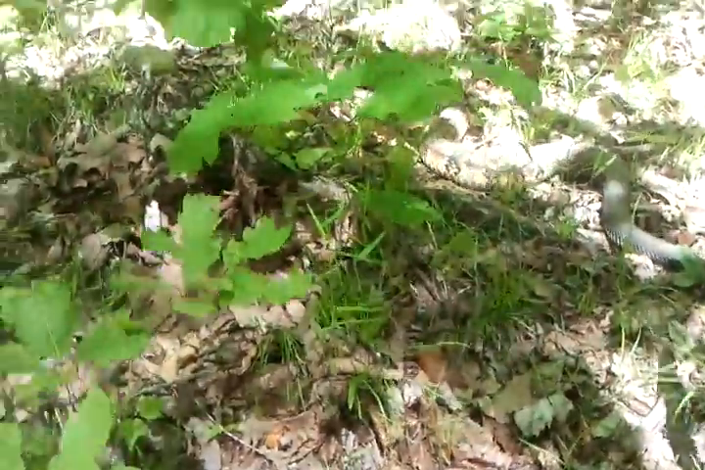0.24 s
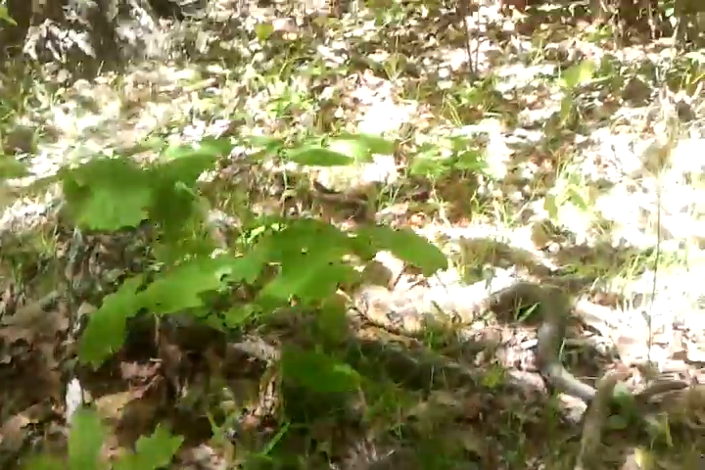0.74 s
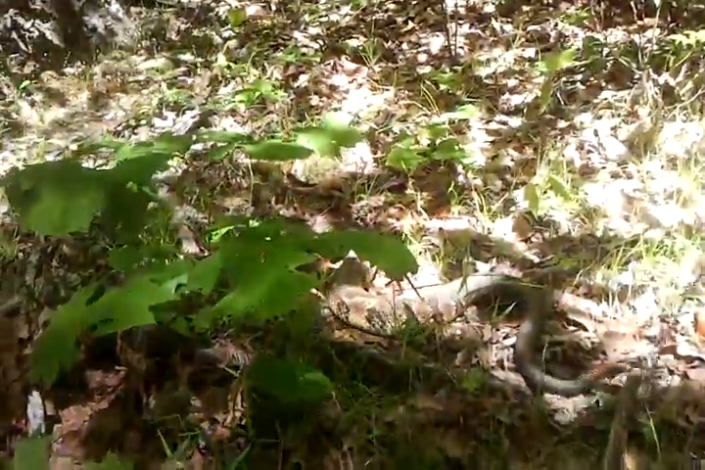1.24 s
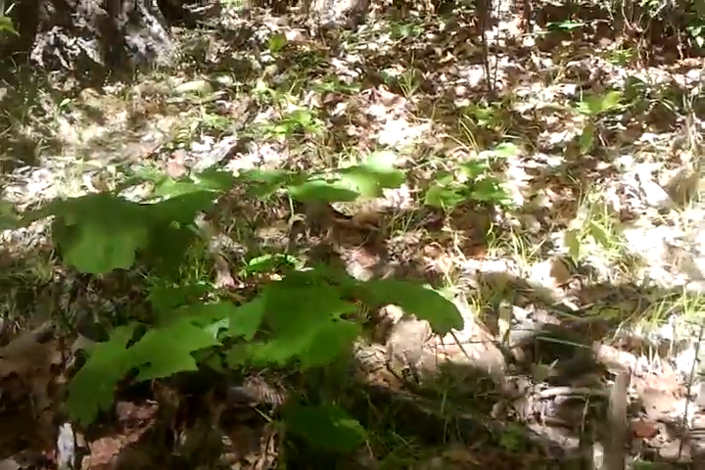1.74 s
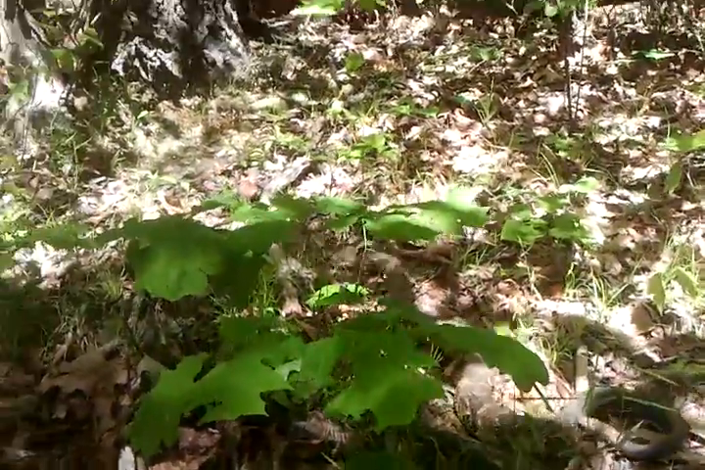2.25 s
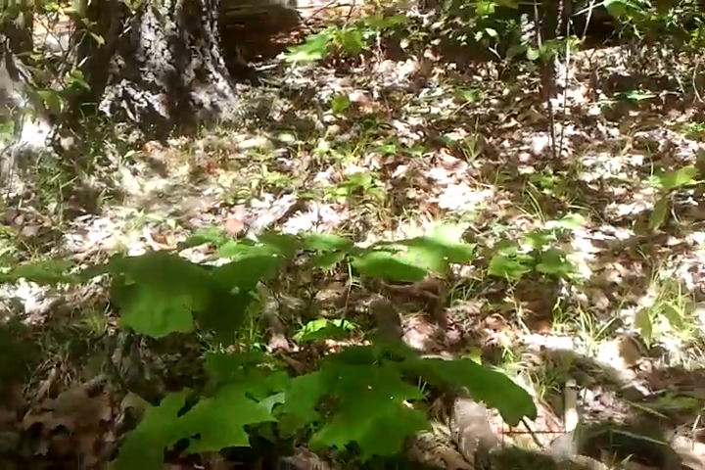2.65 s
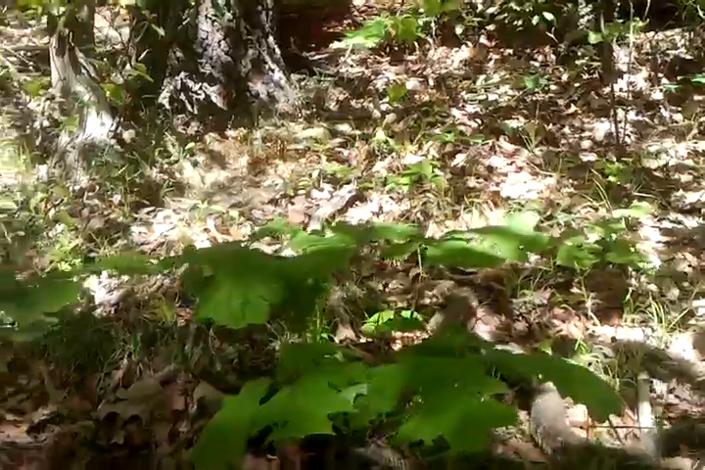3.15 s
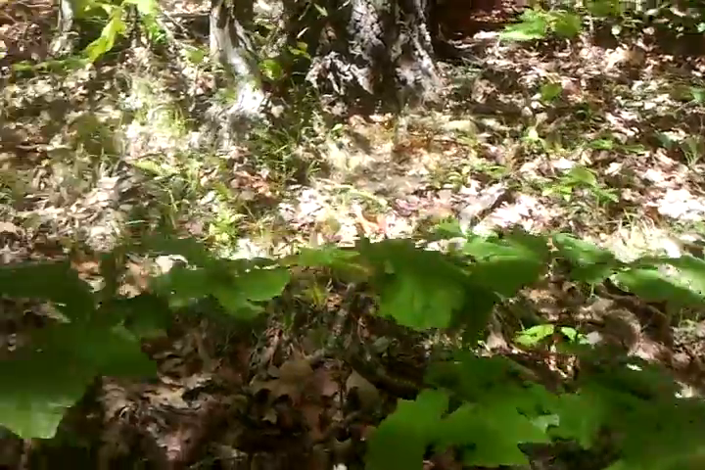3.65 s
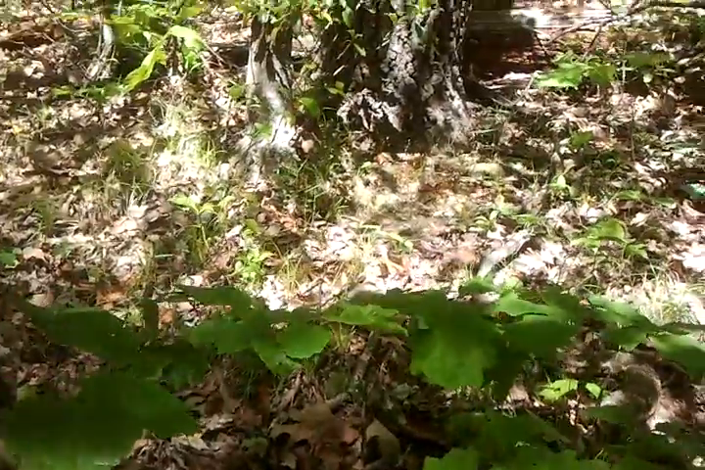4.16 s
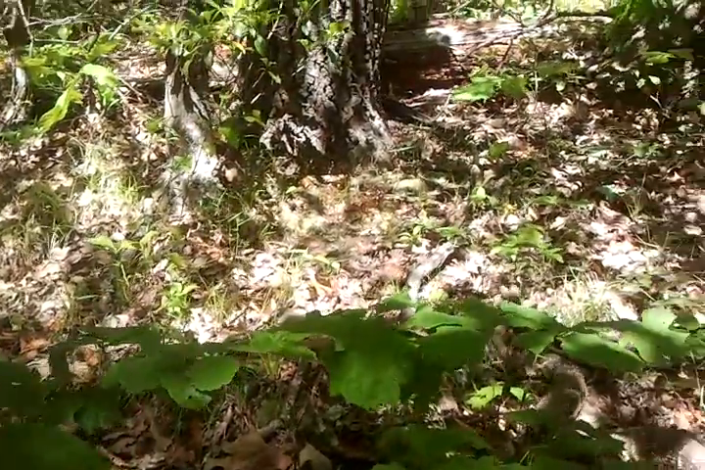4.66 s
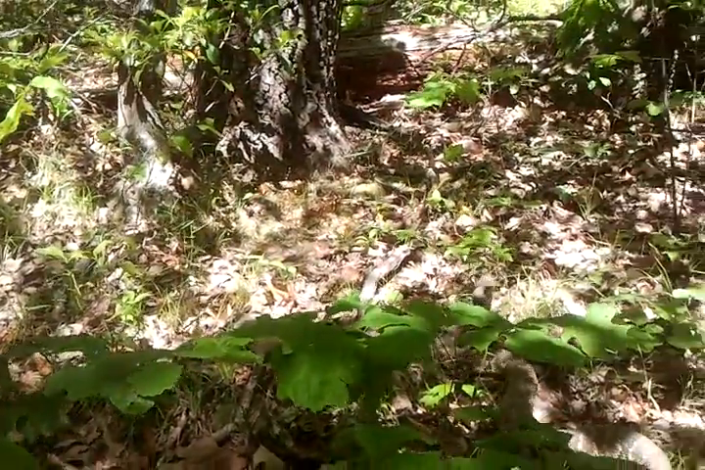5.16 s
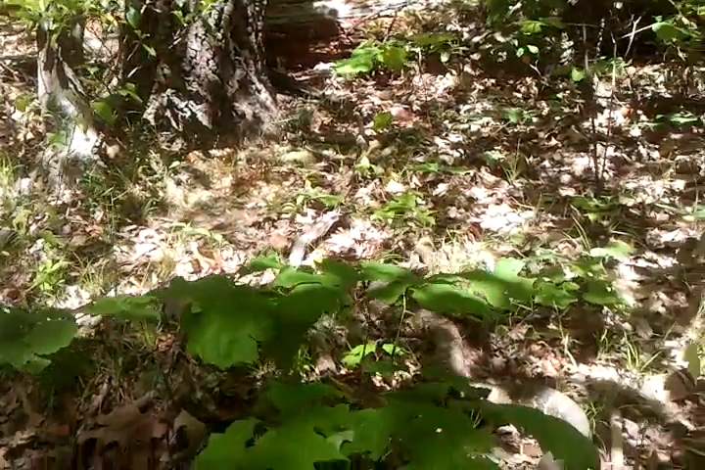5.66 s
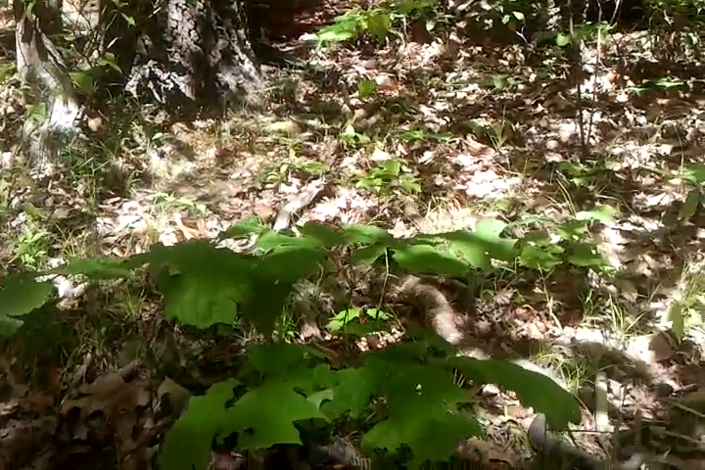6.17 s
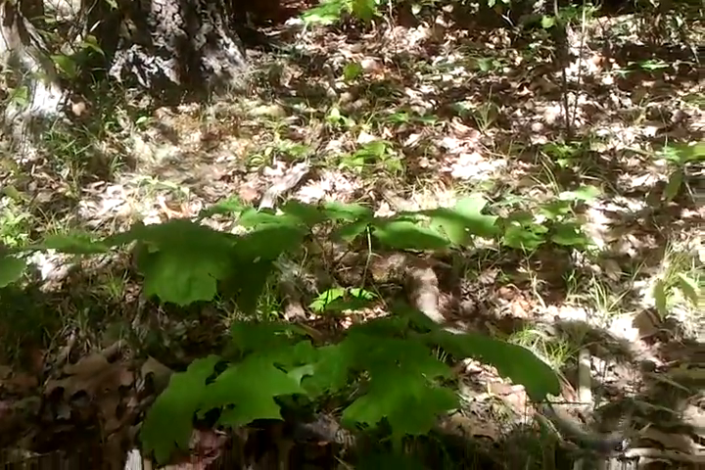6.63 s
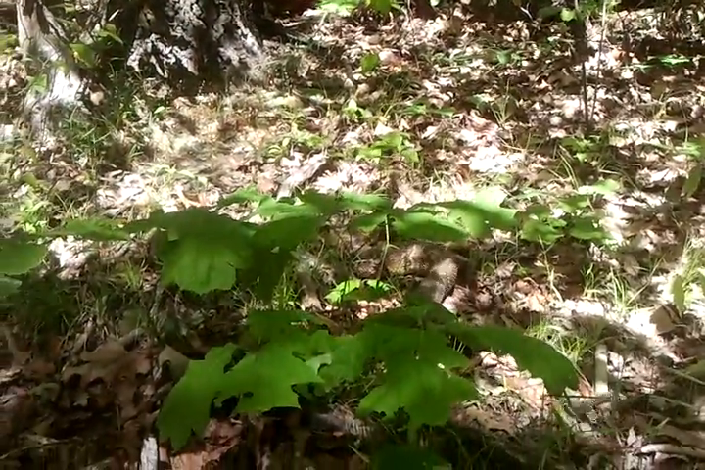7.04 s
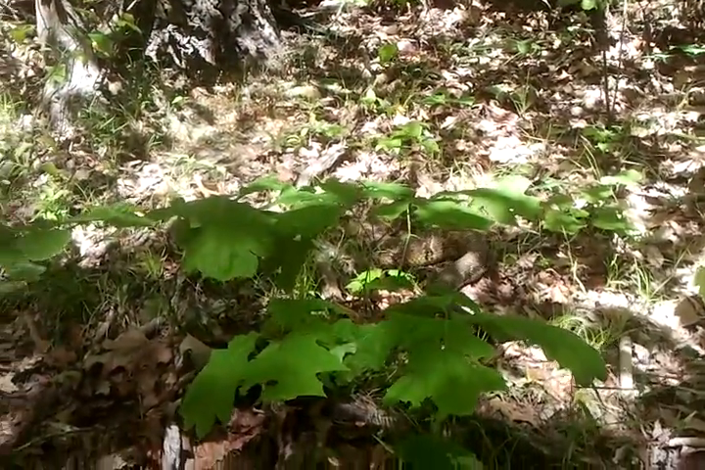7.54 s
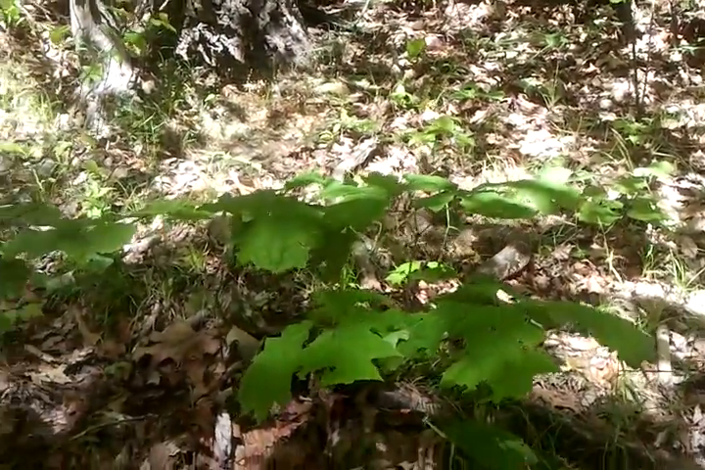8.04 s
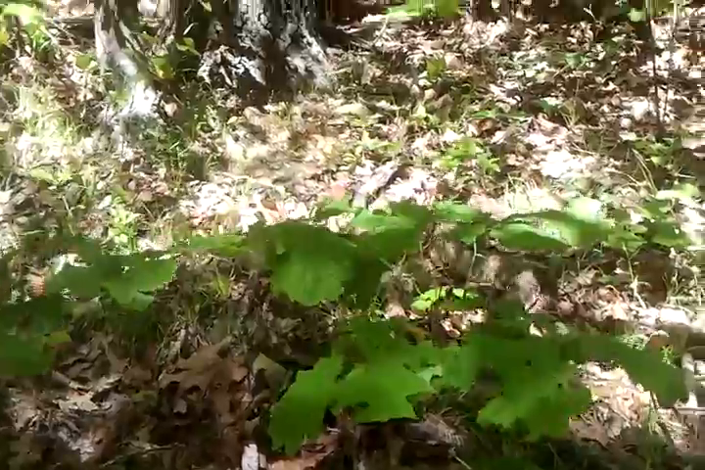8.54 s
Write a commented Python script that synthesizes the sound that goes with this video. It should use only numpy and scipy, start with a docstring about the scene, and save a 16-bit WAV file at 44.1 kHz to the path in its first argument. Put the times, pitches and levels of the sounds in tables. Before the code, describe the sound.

On a quiet forest floor, dry leaves stir and are crushed in uneven, crisp bursts, dotted with sharp little twig snaps. The crunching is strongest in the first half, where soft ground thuds sit under it, and then thins to lighter crackles and ticks. Throughout, a few steps away, a rattlesnake's tail keeps up a faint, high buzz against an even hush of air in the trees.

```python
"""From the start a rattlesnake's tail sizzles faintly, a few steps away, over the soft hush of a wood,
and dry leaf litter stirs. Almost at once the litter is crushed: it crackles and crunches in bursts while
leaves and twigs snap. From about 1.5 to 4 seconds the ground thuds under the heavier breaks. After that
the crushing turns lighter, and sizzle and hush carry on to the end.
Nothing sounds above about 9 kHz."""
import sys
import numpy as np
from scipy import signal
from scipy.fft import rfft, irfft
from scipy.io import wavfile
from scipy.ndimage import uniform_filter1d

SR = 44100
rng = np.random.default_rng(int(sys.argv[2]) if len(sys.argv) > 2 else 0)


def bounce(signal):
    """Save signal as a 16-bit WAV file at the path given by the first command-line argument."""
    frames = np.transpose(np.atleast_2d(signal))
    limited = np.clip(frames, -1, 1)
    pcm = np.round(limited * 32767).astype(np.int16)
    wavfile.write(sys.argv[1], SR, pcm)


N = 388080

# EQ of the air in the trees. Each row: frequency in Hz, relative gain in dB.
HUSH_EQ = [(20, -13), (50, -9.5), (100, -3), (200, -1.5), (350, 2.5), (700, 0), (1300, -2), (2500, -4.5),
           (5000, -14), (9000, -23)]
# EQ of the tail's horny segments. Each row: frequency in Hz, relative gain in dB.
TAIL_EQ = [(2000, -22.5), (3300, -6.5), (4500, -3), (5700, -3.5), (6700, 1.5), (7400, -1), (7900, -1),
           (8600, -11.5)]
# The faint shifting of the leaves. Each row: time in seconds, crackle send in dB.
STIR_FADER = [(0.0, -56), (1.0, -53), (1.999, -49), (3.5, -52.5), (4.6, -52), (5.25, -56), (6.4, -54.5),
              (7.6, -55), (8.1, -52.5), (8.8, -51.5)]
# The litter is pressed down. Each row: start in seconds, hold in seconds, crackle send in dB,
# low crunch in dB relative to that send.
LITTER_PRESSES = [(0.244, 0.041, -37.5, -11), (0.30, 0.029, -43, -11), (0.49, .16, -52.5, -9.5),
                  (1.10, .17, -51, -9), (1.385, .035, -44, -8.5), (1.45, 0.027, -44.5, -24),
                  (1.505, 0.026, -37, -13.5), (1.584, 0.029, -33, -12.5), (1.641, 0.18, -38, -10),
                  (1.891, 0.088, -41.5, -12), (2.025, .045, -43.5, -12), (2.11, .16, -47, -14),
                  (2.342, 0.078, -37.5, -11), (2.44, 0.14, -44.5, -11), (2.61, 0.044, -49.5, -6.5),
                  (2.87, 0.17, -53, -22), (3.17, .11, -48, -9.5), (3.323, 0.27, -47, -13),
                  (3.76, 0.16, -49, -21), (3.95, 0.054, -51.5, -14), (4.44, .18, -51, -16),
                  (4.805, 0.12, -47, -14), (5.0, 0.063, -46.5, -12), (5.375, 0.028, -44.5, -11),
                  (5.47, 0.11, -49, -9.5), (5.625, .06, -50, -10.5), (5.89, 0.2, -51.5, -16),
                  (6.23, 0.099, -52, -13), (6.38, 0.067, -49.5, -10), (6.489, 0.13, -50.5, -11.5),
                  (7.79, 0.061, -47.5, -10.5), (7.96, .14, -48.5, -9), (8.25, 0.11, -50.5, -8),
                  (8.51, 0.13, -53, -8), (8.72, .08, -53, -7)]
# EQ of the bright crackle of the leaves. Each row: frequency in Hz, relative gain in dB.
CRACKLE_EQ = [(1500, -28), (2500, -13), (3200, -6.5), (4000, -4.5), (5400, -1), (6600, 3), (7600, 3.5),
              (8500, -0.5)]
# EQ of the dull crunch deeper in the litter. Each row: frequency in Hz, relative gain in dB.
CRUNCH_EQ = [(25, -3), (100, -3), (250, -1), (500, 0), (1200, 0.5), (2200, 2), (3000, 0), (4500, -30)]
# Single leaves and twigs break; the two rows near 1.47 and 1.48 s, lower and longer, are brief scrapes. # Each
# row: start in seconds, send level in dB, ring pitch in Hz, # low body in dB relative to that level, decay time
# of the fractures in milliseconds.
BREAKS = [(0.2705, -34, 6900, -14, 1.4), (0.2796, -36, 6700, -5, 3.5), (0.3415, -37.5, 6750, -12, 2),
          (0.3773, -48, 4580, 2, 1.3), (0.4219, -38, 6240, -13, .6), (0.556, -22, 7300, -25.5, 1.4),
          (1.108, -42, 6100, -21, 1.5), (1.1616, -32.5, 6760, -15, 0.91), (1.188, -28.5, 6900, -17, 0.27),
          (1.2036, -37.5, 7000, -16, 0.95), (1.2303, -39.5, 6700, -10.5, 1.6), (1.338, -38, 6300, -10, 1.2),
          (1.363, -43, 5800, -5, 0.71), (1.3871, -38, 7100, -4.5, 3.1), (1.467, -37, 4400, -20, 5),
          (1.484, -39, 4170, -21, 2.5), (1.569, -34.5, 6200, -17, 3.6), (1.585, -31.5, 6060, -6, 1.5),
          (1.6967, -37, 5800, -6.5, 1.4), (1.7252, -39.5, 6300, 4, 2.1), (1.7972, -26, 7650, -20, 0.73),
          (1.8108, -21, 7500, -27, 0.17), (1.8515, -32, 7100, -15, 0.71), (1.9694, -36.5, 5860, -7.5, 1.5),
          (2.029, -32.5, 6500, -12.5, 0.35), (2.064, -36, 6100, -8, 1.9), (2.1275, -45, 6400, -2.5, 0.64),
          (2.1775, -41.5, 5700, -4, 0.37), (2.3983, -38, 5860, -3, 1), (2.814, -34.5, 7600, -25, 1.8),
          (2.931, -45, 6300, -16, 1.6), (3.006, -29, 7000, -12, 1.5), (3.01, -29.5, 7240, -19, 0.58),
          (3.04, -24.5, 6600, -15, 1.3), (3.3293, -25, 5900, -13, 0.67), (3.393, -35, 6300, -9.5, 1.2),
          (3.4014, -41, 5900, 3, 0.79), (3.5846, -37, 6900, -18, 0.37), (3.638, -32, 6170, -20, 0.71),
          (3.7654, -32.5, 6330, -12.5, 2.4), (3.892, -37.5, 5540, -12.5, 0.61),
          (3.9649, -42.5, 4660, -9.5, .5), (4.12, -37.5, 6500, -16, 0.26), (4.226, -44, 6050, -5.5, 0.42),
          (4.33, -44.5, 6000, -3.5, 1.8), (4.3592, -37, 5660, -17, 0.32), (4.4544, -42, 6000, -16, 3.6),
          (4.479, -41, 6600, -6.5, 2.2), (4.4981, -40.5, 6100, -10, 1.4), (4.5643, -44, 5440, -8, 0.8),
          (4.5843, -40.5, 5240, -16, .8), (4.609, -45, 5400, -9, .8), (4.7227, -37.5, 5260, -11, 0.82),
          (4.7347, -42, 5800, -6, 1.3), (4.8033, -30.5, 6400, -5, 3.6), (4.894, -37, 6370, -10.5, .7),
          (5.52, -42, 6270, -8.5, 0.5), (5.5459, -44.5, 6900, -2.5, .7), (5.7694, -38.5, 6700, -10.5, 2.2),
          (6.2924, -42, 6400, -13, 1.8), (6.392, -41, 6500, -21, .4), (6.4125, -42, 6600, -6, 1.8),
          (6.5575, -40.5, 6800, -10, 1.6), (7.0607, -38, 7060, -6, 2.1), (7.291, -45.5, 6800, -18, 1.4),
          (7.36, -47, 5650, -18, 1.5), (7.5024, -43, 6460, -10, 0.45), (7.6562, -42.5, 4570, -13, 1.9),
          (7.835, -39, 6200, -22, .4), (7.889, -55, 4400, 8.5, 2), (7.9489, -42, 7200, -22, .5),
          (7.9806, -41, 6100, -15, 0.32), (8.5277, -40, 6750, -10, 0.57), (8.6057, -55, 4000, 9.5, 2.2),
          (8.7716, -38.5, 6700, -8, 1.2)]
# The resonances of dry wood. Each row: frequency in Hz, bandwidth in Hz, gain in dB.
WOOD_RESONANCES = [(1270, 310, -11), (2130, 400, -14.5), (4190, 530, -6)]
# EQ of a snap's sharp edge. Each row: frequency in Hz, relative gain in dB.
EDGE_EQ = [(1500, -21.5), (2800, -11.5), (4000, -4), (5200, 1), (6500, -3.5), (7600, 4), (9000, -8)]
# EQ of a snap's low knock. Each row: frequency in Hz, relative gain in dB.
BODY_EQ = [(30, -10), (150, -10.5), (450, -6.5), (900, -2.5), (1500, -3), (2300, -1.5), (3200, -1),
           (5000, -20)]
# The ground gives way. Each row: start in seconds, peak in dB ahead of the low cut.
GROUND_PUSHES = [(1.586, -40), (1.728, -34), (2.064, -34.5), (3.011, -43), (3.04, -36), (3.328, -39),
                 (3.4019, -36.5), (3.892, -48)]

CUTOFF_HZ = 8290  # the high cut


def from_db(db):
    """Decibels to gain."""
    return 10 ** (np.asarray(db) / 20)


def rms_one(x):
    """Scale to an rms of 1."""
    return x / np.sqrt(np.mean(x ** 2) + 1e-20)


def drift(per_s):
    """A random modulator with an rms of 1, gliding to `per_s` new values a second."""
    knots = rng.standard_normal(8192)
    return rms_one(np.interp(np.arange(N) / SR * per_s, np.arange(len(knots)), knots))


def equalise(x, curve):
    """Apply an EQ curve, scaled so that white noise comes out with its full power below the high cut."""
    hz = np.arange(N // 2 + 1) * SR / N
    curve_hz, curve_db = np.transpose(curve)
    gain = from_db(np.interp(np.log(hz + 1), np.log(curve_hz), curve_db))
    return irfft(rfft(x) * gain / np.sqrt(np.mean(gain ** 2 * (hz < CUTOFF_HZ))), N)


def resonate(x, hz, width_hz):
    """One resonance with a peak gain of 1."""
    radius = np.exp(-np.pi * width_hz / SR)
    feedback = [1, -2 * radius * np.cos(2 * np.pi * hz / SR), radius ** 2]
    return signal.lfilter(np.array([1, 0, -1]) * (1 - radius ** 2) / 2, feedback, x + 1e-18)


def clicks(per_s, spread_db, largest_db):
    """Clicks at random moments, many small and few large."""
    sizes = from_db(largest_db * np.tanh(spread_db * rng.exponential(1, N) / largest_db))
    return sizes * rng.choice([-1, 1], N) * (rng.random(N) < per_s / SR)


def steady(x, seconds):
    """Ride the mean power to 1 over the given time, keeping the fine grain."""
    power = uniform_filter1d(x ** 2, int(seconds * SR) + 1)
    return x / np.sqrt(np.abs(power) + 1e-9)


def scatter(x, wet_db, t60):
    """A noisy reverb tail: each click comes from another spot, so it has reflections of its own."""
    decay = from_db(-120 / (t60 * SR))
    energy = signal.lfilter([1 - decay], [1, -decay], x ** 2 + 1e-18)
    return from_db(wet_db) * np.sqrt(energy) * rng.standard_normal(N)


def add(track, start_s, sound):
    """Mix a sound into a track at the given time."""
    start = int(np.clip(start_s * SR, 0, N - 1))
    track[start:start + len(sound)] += sound[:N - start]


def forest_hush(level_db=-61):
    """A soft, even bed of air in the trees."""
    return from_db(level_db + 0.36 * drift(3.5)) * equalise(rng.standard_normal(N), HUSH_EQ)


def tail_rattle(level_db=-57, flicks_per_s=70):
    """The tail flicks to and fro; its loose segments click so densely that they merge into a sizzle."""
    flicks = np.cumsum(flicks_per_s * (1 + 0.055 * drift(8.8))) / SR
    clicks_per_s = 7000 * (1 + .3 * np.cos(2 * np.pi * flicks))
    sizzle = equalise(clicks(clicks_per_s, spread_db=2.5, largest_db=13.5), TAIL_EQ)
    return from_db(level_db + 1.9 * drift(3.5)) * rms_one(sizzle)


def stirring(wander_db=0.97, crunch_db=-8):
    """Power envelopes of crackle and crunch as the leaves keep shifting, coming and going a little."""
    fader_db = np.interp(np.arange(N) / SR, *np.transpose(STIR_FADER))
    power = from_db(fader_db + wander_db * drift(12)) ** 2
    return power, power * from_db(crunch_db) ** 2


def flakes(grains, low_hz, high_hz, width_hz, count):
    """Deal the grains to small stiff flakes of leaf, each ringing briefly at its own pitch."""
    dealt = rng.integers(0, count, N)
    pitches = np.geomspace(low_hz, high_hz, count)
    return rms_one(sum(resonate(grains * (dealt == k), hz, width_hz) for k, hz in enumerate(pitches)))


def leaf_rustle():
    """Leaves rub in a fine grain and crumple in separate ticks; harder pressure breaks more of them."""
    stir_crackle, stir_crunch = stirring()
    press_crackle, press_crunch = pressing()
    send_db = 10 * np.log10(stir_crackle + press_crackle)
    pressure = from_db(.45 * (send_db + 50))
    rubbing = clicks(2400 * pressure * from_db(3.5 * drift(130)), spread_db=4.5, largest_db=16)
    ticks = clicks(95 * pressure * from_db(3 * drift(25)), spread_db=4.5, largest_db=11)
    ticks += scatter(ticks, wet_db=0.5, t60=0.0045)  # a tick is itself a tiny run of fractures
    grains = steady(rubbing, seconds=0.024) + from_db(1) * rms_one(ticks / np.sqrt(pressure))
    grains = steady(grains + scatter(grains, wet_db=-6, t60=0.07), seconds=0.055)
    ringing = flakes(grains, low_hz=3280, high_hz=8120, width_hz=470, count=14)
    crackle = 0.7 * rms_one(equalise(grains, CRACKLE_EQ))
    crackle += 1.27 * rms_one(equalise(ringing, CRACKLE_EQ))
    # deeper layers of the litter answer with a duller, more blurred crunch
    crunch = rms_one(equalise(grains + scatter(grains, wet_db=-4, t60=0.026), CRUNCH_EQ))
    return from_db(send_db + 1) * rms_one(crackle) + np.sqrt(stir_crunch + press_crunch) * crunch


def pressing(attack_s=0.015, release_s=0.031):
    """Power envelopes of crackle and crunch as pressed leaves give way quickly and settle more slowly."""
    t = np.arange(N) / SR
    crackle, crunch = np.zeros((2, N))
    for start_s, hold_s, db, crunch_db in LITTER_PRESSES:
        attack = np.clip(1 + (t - start_s) / attack_s, 0, 1)
        release = np.exp(-np.clip((t - start_s - hold_s) / release_s, 0, 20))
        power = (from_db(db) * attack * release) ** 2
        crackle += power
        crunch += power * from_db(crunch_db) ** 2
    return crackle, crunch


def snaps(samples=512):
    """Each break is a run of tiny fractures: a sharp edge, the leaf's ring, a woody ring, a low knock."""
    t_ms = 1000 * np.arange(samples) / SR
    treble = signal.butter(2, [3000, CUTOFF_HZ], "band", fs=SR, output="sos")
    bass = signal.butter(2, 3000, fs=SR, output="sos")
    ring, edge, body = np.zeros((3, N))
    for start_s, db, ring_hz, body_db, decay_ms in BREAKS:
        noise = rng.standard_normal(samples)
        fractures = noise * np.abs(noise) * np.exp(-t_ms / decay_ms)
        fractures[0] += 2.2  # the first tear is the sharpest
        gain = from_db(db) * np.sqrt(.004 * SR)  # the energy of 4 ms at this level
        tone = resonate(resonate(fractures, ring_hz, width_hz=1800), ring_hz, width_hz=5500)
        add(ring, start_s, gain * tone / np.linalg.norm(tone))
        # thin pieces mostly ring, thick ones crack: more body brings more edge
        edge_gain = gain * from_db(0.19 * body_db) / np.linalg.norm(signal.sosfilt(treble, fractures))
        body_gain = gain * from_db(body_db) / np.linalg.norm(signal.sosfilt(bass, fractures))
        add(edge, start_s, edge_gain * fractures)
        add(body, start_s, body_gain * fractures)
    strike = body + from_db(-5) * edge
    wood = sum(from_db(db) * resonate(strike, hz, width_hz) for hz, width_hz, db in WOOD_RESONANCES)
    # the ground close by answers at once, trunks and foliage a little later
    edge += scatter(edge, wet_db=-5, t60=0.046) + scatter(edge, wet_db=-11.5, t60=0.18)
    body += scatter(body, wet_db=-8, t60=0.17)
    crack = from_db(-8.5) * equalise(edge, EDGE_EQ) + from_db(-8) * equalise(body, BODY_EQ)
    return from_db(-1) * ring + wood + crack


def ground_thuds(high_cut_hz=420, low_cut_hz=60):
    """The soft ground gives a short, dull push under the heavier breaks."""
    pushes = np.zeros(N)
    pulse = signal.sosfilt(signal.butter(2, high_cut_hz, fs=SR, output="sos"), signal.unit_impulse(1024))
    for start_s, db in GROUND_PUSHES:
        add(pushes, start_s, from_db(db) * pulse / pulse.max())
    return signal.sosfilt(signal.butter(1, low_cut_hz, "high", fs=SR, output="sos"), pushes + 1e-18)


def scene():
    """All layers in one mono mix, from the foreground back to the bed."""
    return (snaps() + ground_thuds() + leaf_rustle() + tail_rattle() + forest_hush())[None]


def record(dry):
    """A steep low-pass filter cuts the top end."""
    taps = signal.firwin(71, CUTOFF_HZ, window=("kaiser", 6), fs=SR)
    return signal.fftconvolve(dry, taps[None], mode="same")


dry = scene()
out = record(dry)
bounce(out)
```